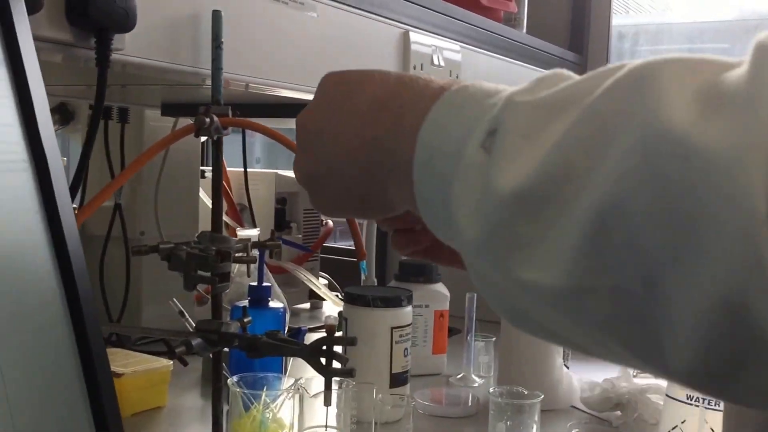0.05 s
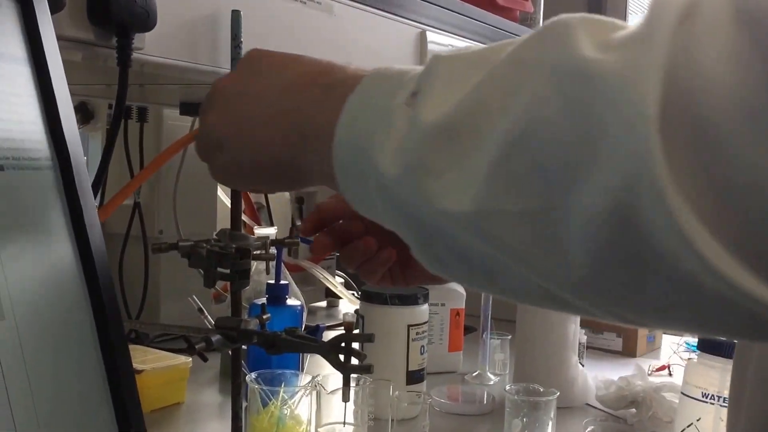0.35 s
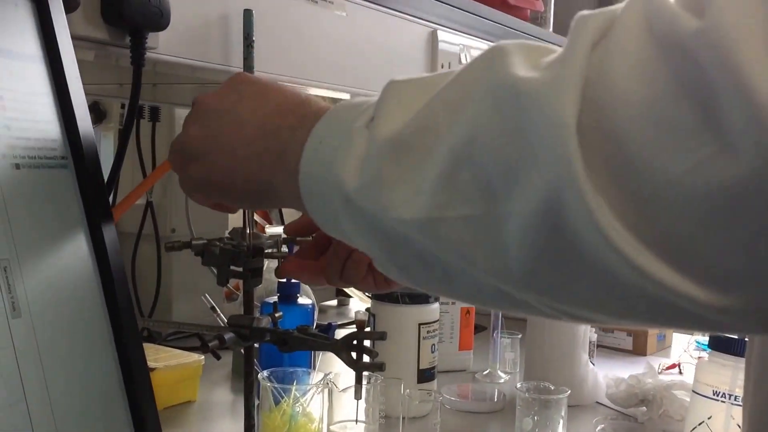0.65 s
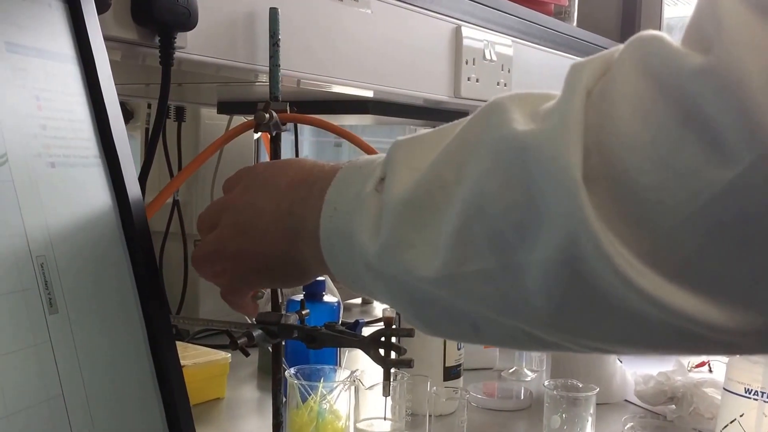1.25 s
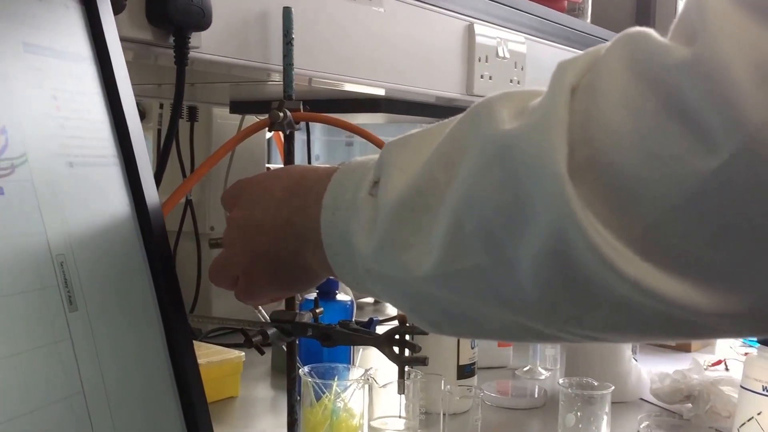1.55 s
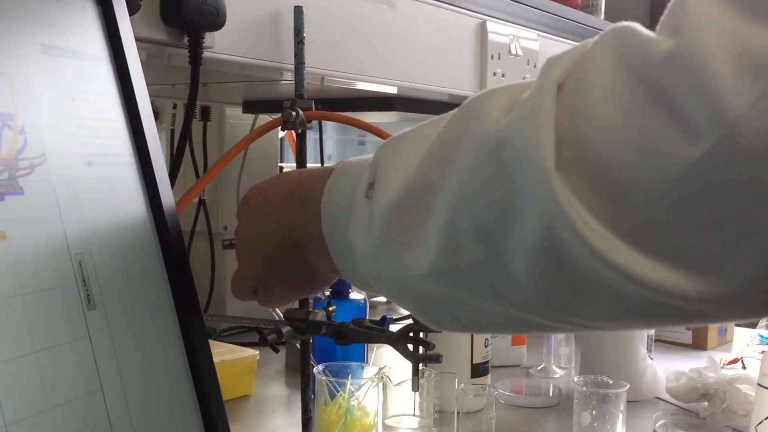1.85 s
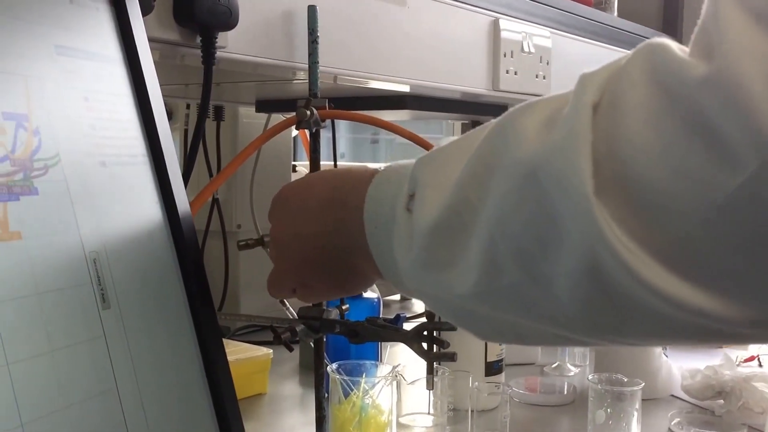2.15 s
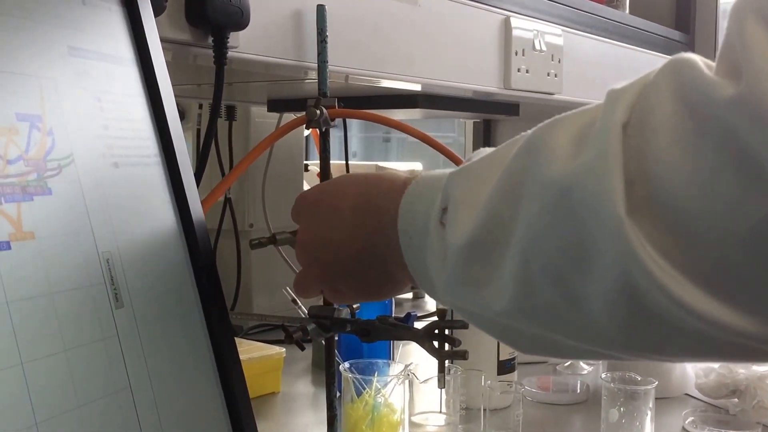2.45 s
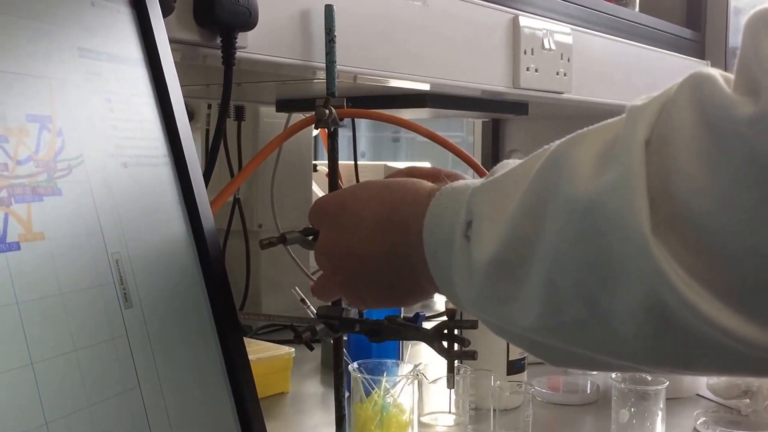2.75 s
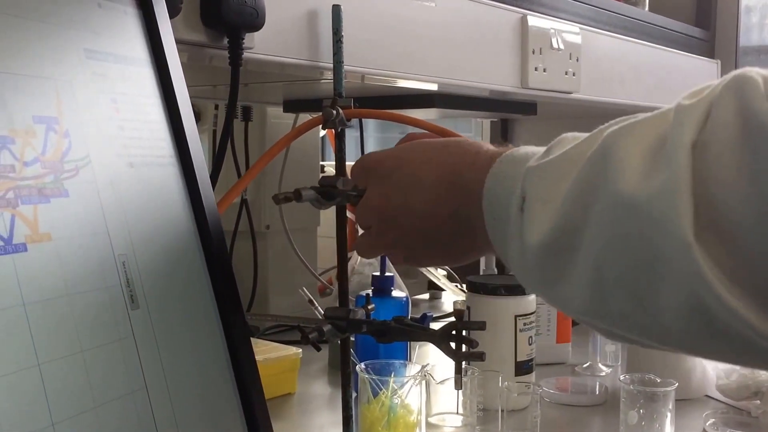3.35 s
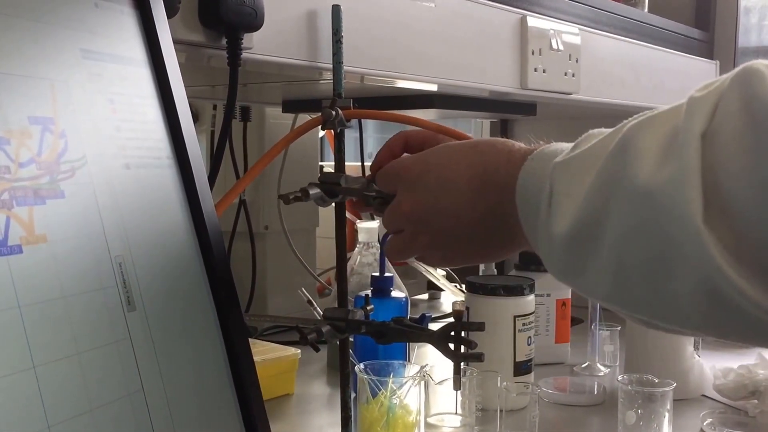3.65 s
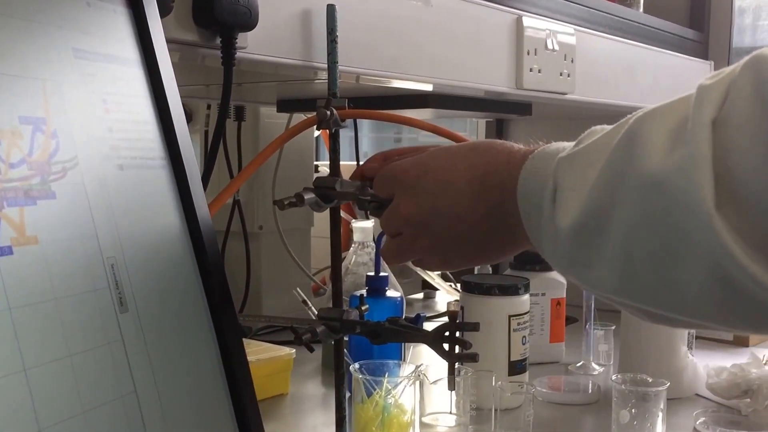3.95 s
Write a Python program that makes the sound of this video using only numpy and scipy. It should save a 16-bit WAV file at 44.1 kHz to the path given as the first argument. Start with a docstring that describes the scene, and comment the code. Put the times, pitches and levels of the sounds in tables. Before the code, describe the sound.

A hand works a metal clamp on its rod, first with faint ticks and soft knocks, then a snap, a brief high squeak and a run of clicks and scrapes, over steady ventilation rumble in a small laboratory.

```python
"""Ventilation hums in a small room, and a hand starts to work a metal clamp on a laboratory stand.
Light ticks and dull bumps come first, with a thin whistle of sliding parts; then a sharp snap, one high
squeak, and a run of small clicks and short grinding slips. Blows and friction ring the clamp and its
rod, while the bumps wake the low modes of the stand. The hum is air rumble with duct resonances."""
import sys
import numpy as np
from scipy import signal
from scipy.fft import rfft, irfft, next_fast_len
from scipy.io import wavfile
from scipy.ndimage import uniform_filter1d, map_coordinates

SR = 44100
rng = np.random.default_rng(int(sys.argv[2]) if len(sys.argv) > 2 else 0)


def store_wav(level_fs):
    """Save 16-bit WAV to argv[1]."""
    pcm = np.round(np.clip(np.atleast_2d(level_fs), -1, 1) * 32767)
    wavfile.write(sys.argv[1], SR, pcm.T.astype(np.int16))


N = 4 * SR

# The colour of metal grinding on metal. Each row: frequency in Hz, relative level in dB.
GRIT_SPECTRUM = [(400, -8), (605, 9), (850, -26.5), (1210, 6.5), (1890, -11.5), (2660, -7.5), (3130, -24),
                 (3750, -17), (4400, -30), (6190, -44), (9940, -41.5), (15500, -72)]


def amp(db):
    """Decibels to gain."""
    return 10 ** (np.asarray(db) / 20)


def unit(x):
    """Scale to rms 1."""
    return x / np.sqrt(np.mean(x ** 2) + 1e-20)


def along(points, hz):
    """Read a curve of (Hz, value) points on a log frequency axis."""
    f, v = np.transpose(points)
    return np.interp(np.log(hz + 1), np.log(f + 1), v)


def filtered(x, gain):
    """Equalise x with a gain that is a function of frequency."""
    size = next_fast_len(len(x) + SR // 4)
    return irfft(rfft(x, size) * gain(np.fft.rfftfreq(size, 1 / SR)), size)[:len(x)]


def noise(spectrum, size):
    """Coloured noise of rms 1."""
    return unit(filtered(rng.standard_normal(size), lambda hz: amp(along(spectrum, hz))))


def wobble(rate):
    """A smooth random curve with rate knots a second."""
    return map_coordinates(rng.standard_normal(int(N * rate / SR) + 4), [np.arange(N) * rate / SR])


def add(track, start, x):
    """Mix x into the track, from start in seconds."""
    i = int(start * SR)
    track[i:i + len(x)] += x[:max(N - i, 0)]


def ring(modes, t, scatter_db=2):
    """Damped modes, each struck a little differently every time."""
    return sum((-1) ** k * amp(db + scatter_db * rng.normal() - 60 * t / t60) * np.sin(2 * np.pi * hz * t)
               for k, (hz, db, t60) in enumerate(modes))


def struck(force, parts, tilt_db):
    """A force rings each part at the part's own rms; tilt_db per octave sets the contact's hardness."""
    pivot_hz, shelf_hz = 1290, 7440  # the tilt levels off outside this band
    hit = sum(unit(signal.fftconvolve(force, part)[:len(part)]) * np.sqrt(np.mean(part ** 2))
              for part in parts)
    return filtered(
        hit, lambda hz: amp(tilt_db * np.log2(np.hypot(1, hz / pivot_hz) / np.hypot(1, hz / shelf_hz))))


def room(x):
    """Close reflections from bench and shelf, and a short tail."""
    # The room's decay. Each row: frequency in Hz, T60 in seconds.
    decay = [(150, 0.46), (1300, 0.4), (5000, 0.33), (12000, 0.35)]
    tail_db, early_db, early_s = -14, -7.5, .02
    hz, t, spectra = signal.stft(rng.standard_normal(SR // 2), SR, nperseg=256)
    tail = signal.istft(spectra * amp(-60 * t / along(decay, hz)[:, None]), SR, nperseg=256)[1]
    delays = (rng.random(12) * early_s * SR).astype(int)
    early = np.bincount(delays, rng.standard_normal(12), len(tail))
    response = amp(tail_db) * tail / np.linalg.norm(tail) + amp(early_db) * early / np.linalg.norm(early)
    return x + signal.fftconvolve(x, np.pad(response, (SR // 400, 0)))[:N]  # 2.5 ms of pre-delay


def ventilation():
    """The bed: gently shifting air rumble with a few narrow duct resonances."""
    # The colour of the air. Each row: frequency in Hz, relative level in dB.
    air_spectrum = [(15, -93), (25, -58), (44, -20.5), (91, -6.5), (136, -1), (169, -5.5), (253, -7),
                    (340, -18.5), (399, -19.5), (457, -24), (509, -24), (552, -31.5), (598, -28.5),
                    (666, -35.5), (762, -34.5), (1240, -42.5), (1800, -42.5), (15500, -63)]
    # Duct resonances. Each row: centre in Hz, width in Hz, level in dB.
    ducts = [(133.2, 28.6, -48), (200.7, 20, -50.5), (257.5, 18, -58), (303.5, 28, -61), (60, 12, -56.5),
             (614, 4.4, -71)]
    air_db, drift_db = -43, 1.2
    spectra = signal.stft(noise(air_spectrum, N), nperseg=512)[2]
    drift = uniform_filter1d(rng.standard_normal(spectra.shape), size=6, axis=0)  # smooth in frequency
    drift = unit(uniform_filter1d(drift, size=14, axis=1))  # and in time
    air = amp(air_db) * signal.istft(spectra * amp(drift_db * drift), nperseg=512)[1][:N]
    for centre, width, db in ducts:
        hum = filtered(rng.standard_normal(N), lambda hz: 1 / (1 + (2 * (hz - centre) / width) ** 2))
        air += amp(db) * unit(hum)
    return air


def friction_tone(curve, jitter, waver=.005, flutter_db=2.5):
    """A fluttering sine glide; fast jitter and slower waver bend it by a fraction of its pitch."""
    times, hz, db = np.transpose(curve)
    t = np.arange(N) / SR
    pitch = np.interp(t, times, hz) * (1 + jitter * wobble(600) + waver * wobble(45))
    level = np.interp(t, times, db, left=-150, right=-150) + flutter_db * wobble(50.1)
    return amp(level) * np.sin(2 * np.pi * np.cumsum(pitch) / SR)


def whistles():
    """Sliding parts sing in faint, overlapping glides."""
    # One curve per whistle. Each point: time in seconds, pitch in Hz, level in dB.
    glides = [
        [(.94, 7100, -91), (.98, 7470, -73), (1.025, 7600, -76), (1.06, 8400, -73), (1.12, 8830, -79),
         (1.2, 8470, -72), (1.31, 7980, -76), (1.41, 7630, -76), (1.5, 6870, -83)],
        [(1.04, 10800, -90), (1.12, 11960, -74), (1.17, 11960, -77), (1.23, 11700, -69), (1.3, 11530, -81),
         (1.39, 11340, -77), (1.48, 9550, -88), (1.55, 9000, -87)],
        [(1.03, 13200, -87), (1.08, 13450, -75), (1.14, 13300, -86), (1.165, 12700, -75), (1.22, 12300, -72),
         (1.29, 11900, -77)],
        [(1.17, 13900, -82), (1.24, 14000, -77), (1.28, 14550, -78), (1.315, 14500, -69), (1.34, 14000, -75)],
        [(1.22, 6030, -78), (1.33, 6050, -80), (1.39, 5880, -75), (1.43, 5620, -87)],
    ]
    return sum(friction_tone(glide, jitter=.004) for glide in glides)


def squeak():
    """Sliding parts give one brief, rough squeak near 12 kHz."""
    # The squeak's path. Each row: time in seconds, pitch in Hz, level in dB.
    glide = [(2.052, 11900, -81), (2.057, 12000, -50), (2.065, 12080, -43), (2.072, 11850, -57),
             (2.085, 12100, -64)]
    return friction_tone(glide, jitter=.015)


def clamp_ring(t, rod_hz):
    """The clamp rings with the rod, whose pitch depends on the grip; higher rod pings die sooner."""
    # The clamp's modes. Each row: frequency in Hz, relative level in dB, T60 in seconds.
    clamp_modes = [(1076.4, -7.5, 0.12), (1223.6, -5, 0.15), (1338, -7, 0.15), (1483, -3, 0.11),
                   (2444, -8, 0.051), (2642, 0, 0.044), (3850, -11.5, 0.024), (4660, -20, 0.026)]
    grip_detune, rod_db, rod_t60_cycles = .007, 6.5, 75
    modes = [(hz * (1 + grip_detune * rng.normal()), db, t60) for hz, db, t60 in clamp_modes]
    return ring(modes + [(rod_hz, rod_db, rod_t60_cycles / rod_hz)], t)


def rubbing():
    """Fine grains of friction ring the clamp as it is turned."""
    # The swells of the rubbing. Each row: time in seconds, level in dB.
    swells = [(0, -74), (2.43, -70.5), (2.57, -55.5), (2.7, -64.5), (3.0, -71), (3.1, -44.5), (3.19, -63.5),
              (3.33, -48), (3.42, -58.5), (3.65, -75), (4, -63.5)]
    grains_per_s, sway_db = 3000, 2
    level = np.interp(np.arange(N) / SR, *np.transpose(swells))
    grains = rng.standard_normal(N) * (rng.random(N) < grains_per_s / SR) * amp(sway_db * wobble(35))
    metal = unit(signal.fftconvolve(grains, clamp_ring(np.arange(SR // 8) / SR, rod_hz=1063))[:N])
    grit = unit(filtered(grains, lambda hz: amp(along(GRIT_SPECTRUM, hz))))
    return amp(level) * (amp(-6.5) * metal + grit)


def ticks():
    """Small loose parts touch: each tick is a short rasp in one resonance."""
    # Light touches. Each row: start in seconds, level in dB, pitch in Hz, rise time in seconds.
    touches = [(0.34, -58, 4280, 0.0028), (0.584, -55, 1420, 0.0052), (0.586, -60.5, 2500, 0.0047),
               (0.585, -61, 7700, 0.0024), (0.972, -61.5, 2660, 0.0048), (0.977, -66, 3800, .0053),
               (1.256, -56.5, 2460, 0.003), (1.255, -55, 1320, 0.0033), (2.806, -62.5, 4000, 0.0019),
               (3.936, -59, 3600, 0.0036), (3.936, -58.5, 5000, 0.0016)]
    damping = .1
    out, t = np.zeros(N), np.arange(SR // 8) / SR
    for start, db, centre, rise in touches:
        rasp = filtered(rng.standard_normal(len(t)),
                        lambda hz: (hz / np.hypot(2 * hz * damping, centre - hz ** 2 / centre)) ** 2)
        t60 = .026 + 10 * rise
        envelope = np.minimum(t / rise, 1) * amp(-60 * np.maximum(t - rise, 0) / t60)
        add(out, start, amp(db) * unit(rasp) * envelope)
    return out


def bumps():
    """The hand pushes the stand against the bench: low modes and a soft thud."""
    # Soft pushes. Each row: start in seconds, relative level in dB, low-pass cutoff in Hz.
    pushes = [(0.657, -42.5, 800), (1.413, -42, 448), (1.541, -36.5, 744), (1.645, -31, 1430),
              (1.664, -41, 980), (1.862, -42, 594), (1.885, -34.5, 530), (2.383, -39.5, 700),
              (2.844, -37.5, 1000), (2.916, -39.5, 540), (3.086, -32.5, 700), (3.115, -39.5, 700),
              (3.216, -35.5, 1007), (3.245, -36.5, 750), (3.289, -40.5, 1110), (3.311, -34.5, 816),
              (3.473, -44, 800), (3.585, -39, 456), (3.76, -42, 690), (3.866, -42, 806)]
    # The stand's modes. Each row: frequency in Hz, relative level in dB, T60 in seconds.
    stand_modes = [(146, 5.5, 0.082), (205, -8.5, 0.075), (283, 5, 0.06), (363, 4, 0.038),
                   (518, -17.5, 0.023), (630, -12.5, .1), (731, -15.5, 0.058), (1013, -14, 0.065),
                   (1280, -4.5, 0.025)]
    # The colour of a soft contact. Each row: frequency in Hz, relative level in dB.
    thud_spectrum = [(80, -40), (250, 7), (750, 9.5), (1400, -4), (2200, -35)]
    thud_db, thud_t60, attack_s = 2, .066, .0015
    out, t = np.zeros(N), np.arange(SR // 4) / SR
    for start, db, cutoff_hz in pushes:
        thud = amp(thud_db - 60 * t / thud_t60) * noise(thud_spectrum, len(t))
        bump = (ring(stand_modes, t) + thud) * (1 - np.exp(-t / attack_s))
        lowpass = signal.butter(2, cutoff_hz, fs=SR, output="sos")
        add(out, start, amp(db - 3) * signal.sosfilt(lowpass, bump))
    return out


def slips():
    """The clamp grinds on the rod: a swell of tiny catches that dies away."""
    # Short grinds. Each row: start in seconds, relative level in dB, brightness in dB per octave,
    # rise time of the force in seconds, rod pitch in Hz.
    grinds = [(2.026, -47.5, 6.5, 0.0013, 1405), (2.256, -46.5, -1.5, 0.01, 1220),
              (2.376, -43, 13.5, 0.002, 1354), (2.469, -45, -0.5, 0.0027, 1410),
              (2.503, -41, -7, 0.0052, 1100), (2.543, -36.5, -5, 0.0047, 1060),
              (2.612, -37.5, -2.5, .0045, 1320), (2.841, -48, 1, 0.0014, 1085),
              (2.912, -46.5, -1.5, 0.0015, 1414), (3.05, -41.5, 7.5, 0.0057, 1130),
              (3.084, -34, 5, 0.0025, 1087), (3.117, -34, 0, 0.0055, 1400),
              (3.135, -42.5, -5.5, 0.0027, 1375), (3.2845, -26.5, -1.5, 0.0009, 947),
              (3.293, -37, 8.5, 0.0033, 1040), (3.312, -40, 0, 0.009, 1280),
              (3.463, -34.5, -12.5, 0.0084, 1090)]
    ring_db, grit_t60, attack_s = -14, .03, .0005
    out, t = np.zeros(N), np.arange(SR // 6) / SR
    for start, db, tilt_db, rise, rod_hz in grinds:
        catches = rng.laplace(size=len(t)) * t * np.exp(-t / rise)
        grit = amp(-60 * t / grit_t60) * noise(GRIT_SPECTRUM, len(t)) * (1 - np.exp(-t / attack_s))
        metal = amp(ring_db) * clamp_ring(t, rod_hz)
        add(out, start, amp(db) * struck(catches, [metal, grit], tilt_db))
    return out


def clicks():
    """Metal meets metal in a blow and a brief chatter; the first tight cluster is the snap."""
    # Hard contacts. Each row: start in seconds, relative level in dB, brightness in dB per octave,
    # chatter length in seconds, rod pitch in Hz, gain of the ring in dB.
    contacts = [(1.8471, -32, 8.5, 0.0033, 1320, -19), (1.8498, -30, 5, 0.0015, 1303, -9.5),
                (1.8534, -24, -15, 0.001, 1330, -5), (1.863, -20, -25, 0.0025, 1510, -7),
                (1.881, -30, -1.5, 0.0024, 1328, -9.5), (1.8891, -35, 5, 0.0025, 1380, -15),
                (2.03, -46, 1, 0.0025, 2650, 0), (2.37, -34.5, 2, .0025, 1445, -17),
                (2.414, -48.5, 1.5, 0.0061, 1420, -9), (2.609, -44, -2, 0.0024, 1470, -3),
                (3.07, -37.5, -11.5, 0.0011, 1260, 3.5), (3.085, -46.5, 1, 0.0044, 2550, -2),
                (3.123, -52.5, 4.5, .003, 1380, -18), (3.221, -41.5, -2, .0062, 970, -17),
                (3.239, -28.5, -3, 0.0072, 1066, -9), (3.244, -36.5, -3, 0.0016, 2690, 2.5),
                (3.564, -37, -5.5, 0.0019, 1180, 2), (3.758, -37.5, -10.5, 0.0025, 1060, -3),
                (3.864, -33.5, -18.5, 0.0028, 1247, -2.5)]
    # The colour of a hard contact. Each row: frequency in Hz, relative level in dB.
    crack_spectrum = [(400, -32), (800, -37), (1300, 17.5), (2000, -2.5), (2700, 6.5), (3600, 0),
                      (5200, -2), (7500, -6.5), (9700, -8.5), (10700, -19), (12300, -14), (14000, -26),
                      (15500, -31)]
    chatter_gain, chatter_per_s = .55, 2000
    crack_t60, attack_s = .022, .0004
    out, t = np.zeros(N), np.arange(SR // 6) / SR
    for start, db, tilt_db, chatter_s, rod_hz, ring_db in contacts:
        chatter = rng.standard_normal(len(t)) * (rng.random(len(t)) < chatter_per_s / SR)
        force = chatter_gain * chatter * np.exp(-(t / chatter_s) ** 2)
        force[0] = 1  # the blow itself
        crack = amp(-60 * t / crack_t60) * noise(crack_spectrum, len(t)) * (1 - np.exp(-t / attack_s))
        metal = amp(ring_db) * clamp_ring(t, rod_hz)
        add(out, start, amp(db - 2) * struck(force, [metal, crack], tilt_db))
    return out


def scene():
    """The handled stand in the small room, over the ventilation bed, in mono."""
    handling = whistles() + squeak() + clicks() + slips() + ticks() + bumps() + rubbing()
    return (room(handling) + ventilation())[None]


def record(dry):
    """A brick-wall low-pass trims the very top of the treble."""
    return filtered(dry[0], lambda hz: hz < 15800)[None]


dry = scene()
out = record(dry)
store_wav(out)
```